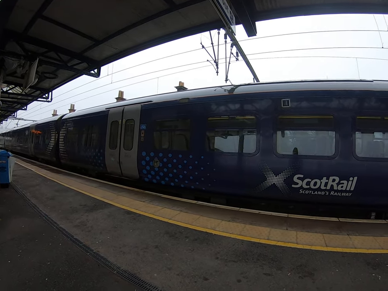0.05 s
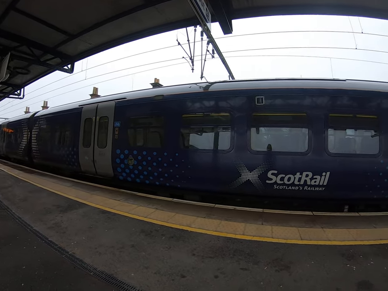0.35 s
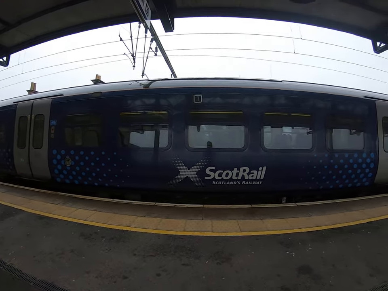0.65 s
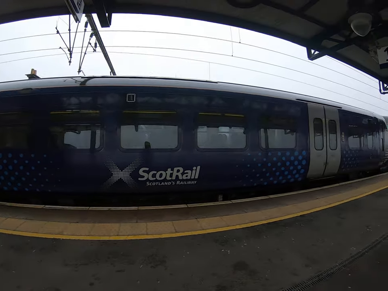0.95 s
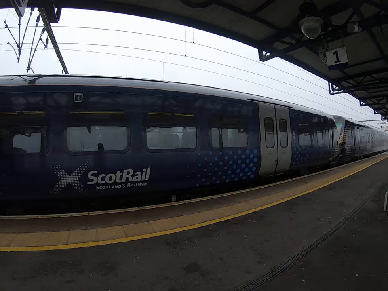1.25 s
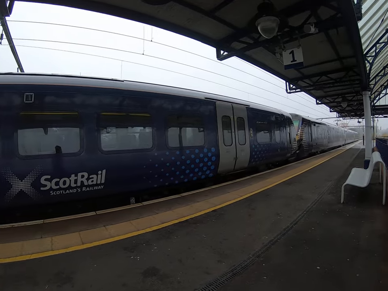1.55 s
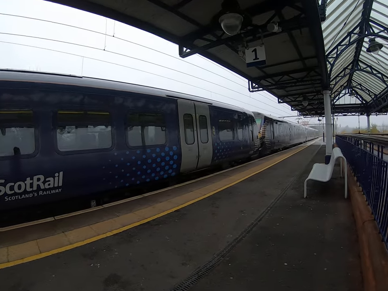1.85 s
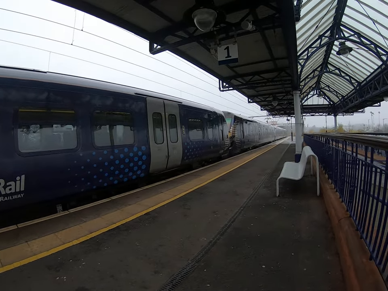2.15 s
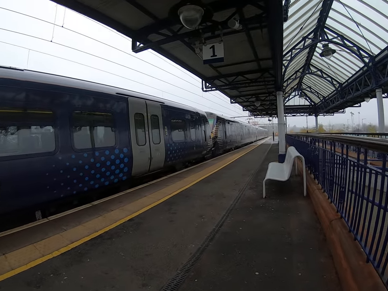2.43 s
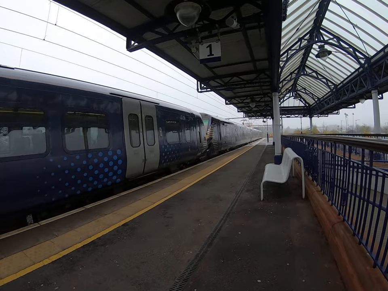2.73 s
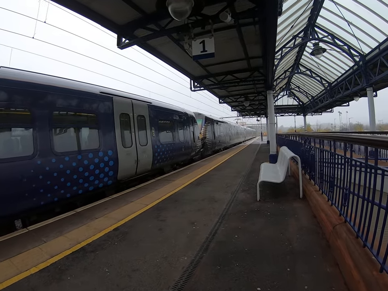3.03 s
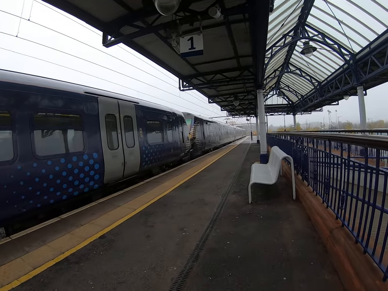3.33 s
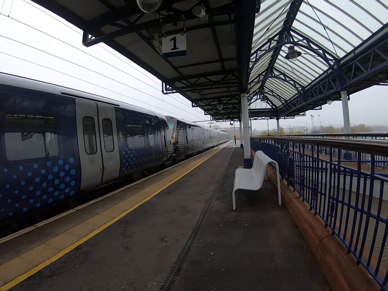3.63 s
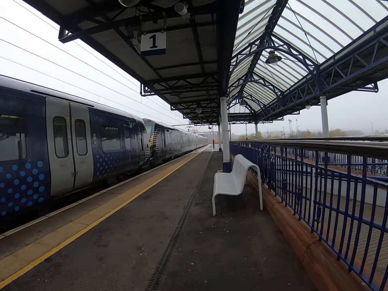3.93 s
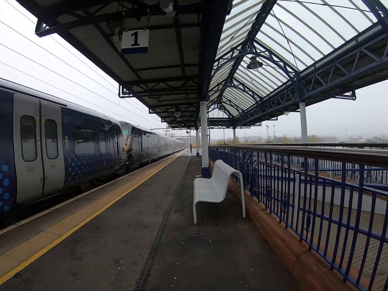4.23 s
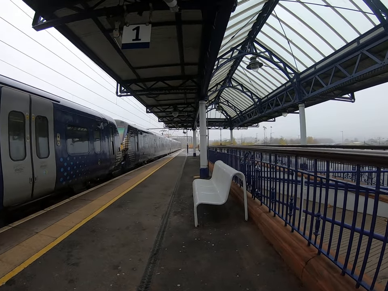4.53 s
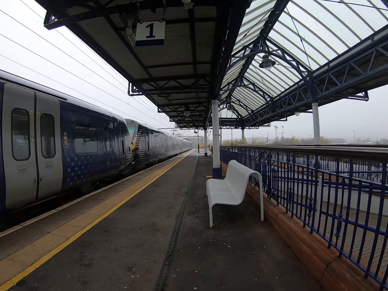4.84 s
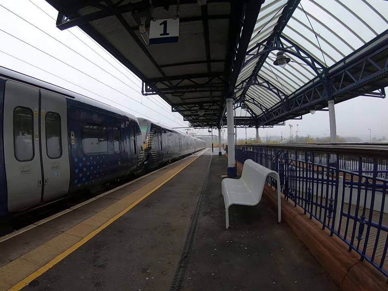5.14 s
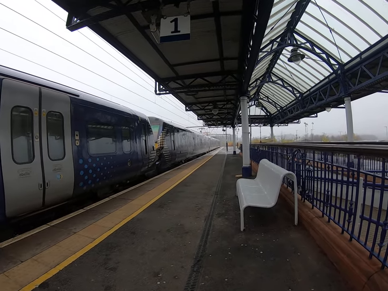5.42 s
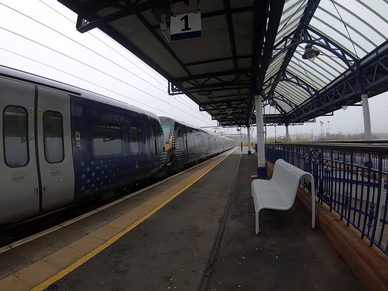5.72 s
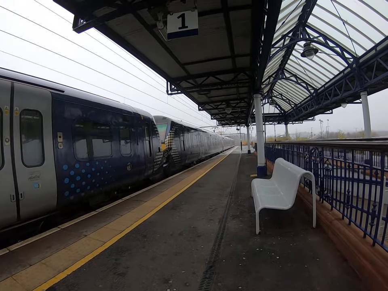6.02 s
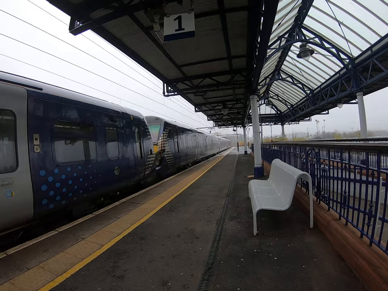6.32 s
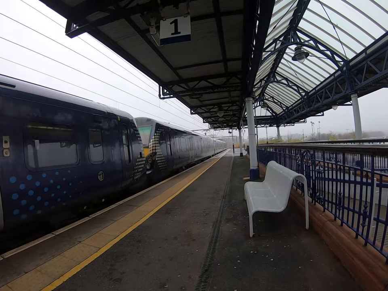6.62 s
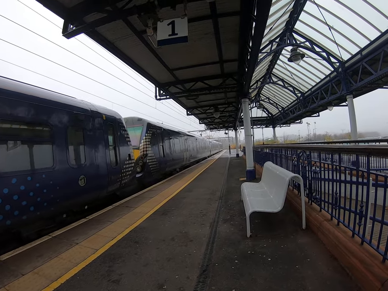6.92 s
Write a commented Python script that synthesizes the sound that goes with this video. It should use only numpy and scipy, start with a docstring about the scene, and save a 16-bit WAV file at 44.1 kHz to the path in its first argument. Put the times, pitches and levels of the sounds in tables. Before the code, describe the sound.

An electric train pulls slowly away, heard close by from a roofed platform. It starts with a high, shimmering electric whine and a thin whistle over a deep motor hum and rushing fans. Wheel rumble builds quickly while the gears growl upward and the undercarriage groans. Midway a wavering low drone swells past, with a brief spit of hiss and a few faint ticks. The whine softens as the rumble carries on.

```python
"""An inverter sings over a deep motor hum as an electric train pulls away along a roofed platform.
Its fixed combs of lines shimmer ever faster as echoes slide against the direct sound; a converter whistles.
Rail roughness raises a rumble and roar, gears growl upward and the bogie frames groan.
An underframe unit drones past, and cooling fans rush behind it all."""
import sys
import numpy as np
from scipy import signal
from scipy.fft import rfft, irfft, next_fast_len
from scipy.io import wavfile

SR = 44100
rng = np.random.default_rng(int(sys.argv[2]) if len(sys.argv) > 2 else 0)


def waveform_to_disk(signal):
    """Save audio, clipped to [-1, 1], as 16-bit WAV at the path in sys.argv[1]."""
    frames = np.transpose(np.atleast_2d(signal))
    scaled = np.clip(frames, -1, 1) * 32767
    samples = np.round(scaled).astype(np.int16)
    wavfile.write(sys.argv[1], SR, samples)


N = 311787
T = np.arange(N) / SR
FFT_SIZE = next_fast_len(N, real=True)
BINS_HZ = np.maximum(np.arange(FFT_SIZE // 2 + 1) * SR / FFT_SIZE, 1)
SOUND_M_PER_S = 343


def undb(db):
    """Decibels to gain."""
    return 10 ** (np.asarray(db) / 20)


def curves(table):
    """Each column of a table over time, sample by sample."""
    s, *columns = np.transpose(table)
    return [np.interp(T, s, c) for c in columns]


def across(table, hz):
    """Each column of a table over frequency, read at hz."""
    f, *columns = np.transpose(table)
    return [np.interp(np.log(hz), np.log(f), c) for c in columns]


def unit(x):
    """Stereo sound scaled to a mid rms of 1."""
    return x / np.sqrt(np.mean(x.mean(axis=0) ** 2))


def bell(offset, sigma):
    """Gaussian swell with peak 1."""
    return np.exp(-0.5 * (offset / sigma) ** 2)


def walk(rate_hz):
    """Smooth random wander with spread 1."""
    knots = np.arange(0, N / SR + 1, 1 / (4 * rate_hz))
    steps = np.convolve(rng.standard_normal(2 ** 13), np.hanning(5), "same")[:len(knots)]
    return np.interp(T, knots, steps / steps.std())


def pan(pan_db):
    """Left and right gains, pan_db apart."""
    return undb(np.array([[pan_db], [-pan_db]]) / 2)


def tone(hz, pan_db):
    """Panned sine on a pitch curve, mid rms 1."""
    return unit(pan(pan_db) * np.sin(2 * np.pi * np.cumsum(hz) / SR))


# Stereo image. Each row: frequency in Hz, coherence 0-1, phase lead in radians, left minus right in dB.
STEREO_IMAGE = [(60, 1, 0.45, -2.5), (150, 1, 0.5, -4.5), (266, 0.91, 0, -5.5), (450, 0.94, .5, -8.5),
                (583, 0.76, 1.2, -7.5), (795, 0.83, 1.74, -1.5), (1100, 0.65, 1.5, 2.5),
                (2300, 0.7, 1.12, 1.2), (3200, 0.6, 0.5, 2), (4280, 0.5, 0.04, -1), (6100, 0, 1.36, -5),
                (8000, .2, 4, -4.5), (9600, .16, 4.5, -0.5)]

def noise(gain):
    """Noise with this gain per bin, spread over the stereo image."""
    coherence, lead, pan_db = across(STEREO_IMAGE, BINS_HZ)
    shared, apart = rfft(rng.standard_normal((2, FFT_SIZE)))
    shared, apart = shared * np.sqrt(1 + coherence), apart * np.sqrt(1 - coherence)
    lean = undb(pan_db / 2)
    mid = np.sqrt(lean ** 2 + lean ** -2 + 2 * coherence * np.cos(lead))
    sides = np.array([(shared + apart) * lean * np.exp(1j * lead), (shared - apart) / lean])
    return unit(irfft(sides * gain / mid, FFT_SIZE)[:, :N])


def coloured(spectrum):
    """Stereo noise shaped by a spectrum table."""
    return noise(undb(across(spectrum, BINS_HZ)[0]))


def ringing(hz, width_hz):
    """Stereo noise in one steep-sided resonance."""
    return noise(1 / (1 + ((BINS_HZ - hz) / (width_hz / 2)) ** 2))


# Fan and air noise. Each row: frequency in Hz, relative density in dB.
FAN_SPECTRUM_DB = [(60, -7), (125, 18.5), (170, 4), (240, -10), (350, 5.5), (450, 6.5), (600, -12),
                   (950, -3.5), (1300, -16), (1900, -18), (4000, -21.5), (9600, -37), (10500, -84.5)]
AIR_SPECTRUM_DB = [(500, -25.5), (1500, -5.5), (3100, 2), (4000, -1.5), (4700, -6), (6300, -6.5),
                   (7500, -9), (8800, -13.5), (9650, -7.5), (10300, -36.5), (14000, -47)]
# Blade tones. Each row: frequency in Hz, relative level in dB.
BLADE_LINES = [(339, -8.5), (388.3, -10.5), (484.5, -8), (616, -14.5), (769, -16)]
# Blade and air envelopes. Each row: time in seconds, level in dB.
BLADE_DB = [(0, -38.5), (1, -36.5), (2.4, -41.5), (3.6, -41), (5, -50), (7.07, -45)]
AIR_DB = [(0, -51), (.45, -50), (.7, -48.5), (3, -49.3), (3.8, -51), (5, -49.5), (7.07, -49.5)]

def fans():
    """Cooling fans rush; the nearest sings on its blade tones and fades as it leaves."""
    blades = sum(undb(db) * tone(hz + 0.84 * walk(5), pan_db=-9) for hz, db in BLADE_LINES)
    fan_noise = coloured(FAN_SPECTRUM_DB) * undb(-37.5)
    air = coloured(AIR_SPECTRUM_DB) * undb(curves(AIR_DB)[0] + 0.56 * walk(3.3))
    return blades * undb(curves(BLADE_DB)[0]) + fan_noise + air


# Next car's drive. Each row: time in seconds, level in dB.
NEXT_CAR_DB = [(0, -70), (1, -65.5), (3.5, -65), (5, -62), (6, -59), (6.6, -58), (6.9, -55), (7.07, -56)]
# Its bands. Each row: centre in Hz, width in Hz, relative level in dB.
NEXT_CAR_BANDS = [(4727, 45, -1), (4827, 130, 1), (9470, 130, -10)]

def next_car():
    """The next car's drive comes closer: narrow bands of high noise."""
    bands = sum(undb(db) * ringing(hz, width_hz) for hz, width_hz, db in NEXT_CAR_BANDS)
    return bands * undb(curves(NEXT_CAR_DB)[0])


# Spit and tick noise. Each row: frequency in Hz, relative density in dB.
HISS_SPECTRUM_DB = [(1500, -14), (4000, 0), (9000, 0), (10500, -20), (14000, -32)]
# Spits. Each row: centre in seconds, sigma in seconds, relative level in dB.
HISS_SPITS = [(3.51, 0.042, -56), (3.6, .028, -60)]

def spits():
    """Short, sputtering spits of hiss."""
    envelope = sum(undb(db) * bell(T - s, sigma_s) for s, sigma_s, db in HISS_SPITS)
    sputter = undb(3.5 * walk(120) - 2)
    return envelope * sputter * coloured(HISS_SPECTRUM_DB)


# Ticks. Each row: start in seconds, level in dB.
HIGH_TICKS = [(3.495, -52), (3.585, -54), (3.94, -53), (4.287, -49), (4.296, -48), (4.305, -45),
              (4.845, -54)]

def ticks(crack_s=0.003, tail_s=0.022, tail_db=-13):
    """Faint, short high ticks, each with a brief tail."""
    envelope = 0
    for s, db in HIGH_TICKS:
        age_s = np.maximum(T - s, 0)
        decay = np.exp(-age_s / crack_s) + undb(tail_db) * np.exp(-age_s / tail_s)
        envelope += (T >= s) * undb(db) * decay
    return envelope * coloured(HISS_SPECTRUM_DB)


# Under the floor. Each row: time in seconds, relative hum and boom levels in dB.
HUM_BOOM_DB = [(0.0, -28.5, -42.5), (1.0, -28.5, -39), (2.0, -30, -37), (2.7, -26.5, -36),
               (3.4, -28.5, -37.5), (4.2, -24.5, -37), (4.8, -27, -38.5), (5.4, -24.3, -33.5),
               (6.0, -25.3, -35), (7.07, -26.5, -37.5)]
# Body boom. Each row: frequency in Hz, relative density in dB.
BOOM_SPECTRUM_DB = [(8, -14.5), (18, -5.5), (28, -3.5), (42, 2.5), (55, 8.5), (66, 8.5), (76, 3.5),
                    (100, -16.5), (160, -44.5), (600, -100)]

def hum_and_boom(hum_hz=48.5):
    """The motors hum steadily and the car bodies boom."""
    hum_db, boom_db = curves(HUM_BOOM_DB)
    hum = tone(hum_hz + 0.18 * walk(1.9), pan_db=-4.5) * undb(hum_db - 0.8 + 0.4 * walk(4.5))
    return hum + coloured(BOOM_SPECTRUM_DB) * undb(boom_db + 3.5)


# Drone envelope. Each row: time in seconds, level in dB.
DRONE_DB = [(2.3, -39), (2.74, -33.5), (2.83, -24), (2.91, -33), (2.98, -21.5), (3.12, -31), (3.25, -25),
            (3.42, -19), (3.58, -24), (3.68, -22.5), (3.92, -27), (4.02, -33), (4.18, -24.5), (4.38, -28),
            (4.55, -26), (5.25, -29.5), (5.45, -34.5), (5.75, -32.5), (5.95, -42), (6.1, -29.5),
            (6.42, -27), (6.68, -35), (6.95, -28), (7.07, -28.5)]

def underframe_drone(start_s=2.3, rise_s=0.2, settled_hz=262.6, run_up_hz=7, run_up_s=0.606):
    """A passing unit runs up its last few Hz, swells, then wavers and flutters as it leaves."""
    age_s = np.maximum(T - start_s, 0)
    leaving = age_s / age_s[-1]
    hz = settled_hz - run_up_hz * np.exp(-age_s / run_up_s) + 1.9 * leaving ** 2 * walk(9.75)
    flutter_db = 3 * leaving * walk(10)
    fade_in = np.minimum(age_s / rise_s, 1)
    return tone(hz, pan_db=-7.5) * undb(curves(DRONE_DB)[0] + flutter_db) * fade_in


# Train speed. Each row: time in seconds, speed in m/s.
SPEED_M_PER_S = [(0, 0.15), (.5, 0.48), (1.5, 0.87), (3, 1.58), (5, 2.3), (7.07, 2.77)]
# Rolling noise. Each row: time in seconds, relative rumble and roar levels in dB.
ROLLING_DB = [(0.0, -43, -46), (0.3, -41, -45), (0.6, -37, -42.5), (1.0, -34.5, -40), (1.4, -33.5, -41),
              (1.9, -31, -38.5), (2.4, -31.5, -38), (2.9, -30, -37), (3.4, -33.5, -38), (3.9, -33.5, -39),
              (4.5, -31, -37.5), (5.2, -32.5, -38), (5.9, -30.5, -37), (6.5, -31, -38.0),
              (7.07, -32.5, -38)]
# Track rumble and wheel roar. Each row: frequency in Hz, relative density in dB.
RUMBLE_SPECTRUM_DB = [(30, -27.5), (80, -13), (115, -10), (150, 3.5), (240, 2), (295, 1.5), (380, -3),
                      (470, -1), (570, -7), (700, -8), (900, -19), (1400, -26.5), (4000, -92.5)]
ROAR_SPECTRUM_DB = [(200, -52), (500, -13), (780, -1), (950, 0.5), (1150, -2), (1400, -4), (1900, -7),
                    (2500, -11.5), (3300, -16), (4500, -30), (8000, -39), (9600, -30), (10500, -73)]
# Wheel and rail modes. Each row: centre in Hz, width in Hz, relative level in dB.
WHEEL_RAIL_MODES = [(572, 12, -7.5), (693, 55, -9), (918, 120, -10), (1137, 110, -10.5), (1326, 31, -14)]

def wheels(full_ring_m_per_s=1.5):
    """Rail roughness shakes the track into a rumble and the wheels into a roar that rings with speed."""
    rumble_db, roar_db = curves(ROLLING_DB)
    rumble = coloured(RUMBLE_SPECTRUM_DB) * undb(rumble_db + 3 + 0.5 * walk(6.5))
    modes = sum(undb(db + 2 * walk(3.3)) * ringing(hz, width) for hz, width, db in WHEEL_RAIL_MODES)
    modes *= np.minimum(curves(SPEED_M_PER_S)[0] / full_ring_m_per_s, 1)
    roar = (coloured(ROAR_SPECTRUM_DB) + modes) * undb(roar_db - 0.6 + 0.5 * walk(8))
    return rumble + roar


# Frame groans. Each row: centre in seconds, level in dB, pitch in Hz.
FRAME_GROANS = [(0.539, -28, 199.5), (.82, -35.5, 200.5), (1.04, -28.5, 195), (1.261, -25.5, 184.5),
                (1.48, -24, 200), (1.75, -30, 180), (2.02, -29, 206), (2.32, -28.5, 286.6),
                (2.43, -25.5, 197.5), (3.02, -29.5, 190), (3.29, -26, 199), (4.13, -28, 291.7),
                (4.88, -27, 292), (5.79, -34, 180), (6.76, -28, 187), (6.83, -30.5, 292)]

def bogie_frames(load_db, mode_hz=192, groan_sigma_s=0.035):
    """Shaken by the gears, the frames rattle around one unsteady mode and now and then groan."""
    mode = tone(mode_hz * (1 + 0.0695 * walk(16)), pan_db=-4.5) * undb(-5 + 0.93 * walk(12))
    rattle = undb(-5) * ringing(hz=207, width_hz=71)
    shake = undb(load_db - 2.5 + 2 * walk(6))
    waver = 1 + 0.0351 * walk(16)
    groans = sum(tone(hz * waver, pan_db=-5.5) * undb(db) * bell(T - s, groan_sigma_s)
                 for s, db, hz in FRAME_GROANS)
    return (mode + rattle) * shake + groans


# Gear mesh. Each row: time in seconds, pitch in Hz.
MESH_HZ = [(0, 150.6), (.5, 203.6), (1.3, 192.2), (2.1, 236), (2.6, 258.4), (3, 270.2), (4.5, 284.2),
           (7.07, 288.7)]

def gears(load_db, leaves_s=2.3, fade_db_per_s=1.8, casing_hz=445):
    """A rough mesh tone climbs; its slightly sharp octave swells through a casing resonance."""
    hz = curves(MESH_HZ)[0]
    mesh_db = load_db - 1.5 - fade_db_per_s * np.maximum(T - leaves_s, 0)
    mesh = tone(hz * (1 + 0.0506 * walk(18)), pan_db=-6.5) * undb(mesh_db + 2.1 * walk(14))
    casing = 1 / np.sqrt(1 + ((2 * hz - casing_hz) / 35) ** 2)
    octave = tone(2 * hz * (1.04 + 0.027 * walk(18)), pan_db=-6)
    return mesh + octave * casing * undb(load_db - 8.5 + 1.4 * walk(10))


def moving_lines(lines, travel_m, scatter, roof, slant=0.35, build_m=0.76, echoes=10):
    """One signal per line of a moving source: the roof echo beats with it, scattered echoes shimmer."""
    step = 256
    way_m = travel_m[::step]
    # A slant is metres of echo detour per metre of travel.
    roof_slant = 0.29
    girders_m = 0.012 * walk(1.5)[::step]
    roof_m = roof_slant * way_m + girders_m + rng.random() / 2
    slants = slant * np.cos(np.pi * (np.arange(echoes) + rng.random(echoes)) / echoes)[:, None]
    detour_m = np.vstack([roof_m, slants * way_m + rng.random((echoes, 1))])
    build_up = np.minimum(way_m / build_m, 1) ** 0.62
    strength = np.append(roof, np.full(echoes, scatter / np.sqrt(echoes)))[:, None] * build_up
    side_lag = np.append(0, rng.standard_normal(echoes))[:, None]
    sounds = []
    for hz, db in lines:
        _, lead, pan_db = across(STEREO_IMAGE, hz)
        paths = strength * np.exp(2j * np.pi * detour_m * hz / SOUND_M_PER_S)
        carrier = np.exp(2j * np.pi * (hz * T + rng.random()))
        channels = []
        for side in (1, -1):
            field = 1 + (paths * np.exp(1j * side * side_lag * min(hz / 2500, 2))).sum(axis=0)
            field *= np.exp(0.5j * side * lead) * undb(side * pan_db / 2)
            channels.append((np.interp(T, T[::step], field) * carrier).real)
        sounds.append(undb(db) * unit(np.array(channels)))
    return sounds


def flares(hz, table, travel_m, sigma_waves):
    """Swells of one line, as when echoes fall into step; they pass quicker as the train gathers way."""
    sigma_m = sigma_waves * SOUND_M_PER_S / np.mean(hz)
    swells = 0
    for k, (s, db, pan_db) in enumerate(table):
        sides = pan(pan_db)
        swell = undb(db) * bell(travel_m - np.interp(s, T, travel_m), sigma_m)
        swells += (-1) ** k * sides / sides.mean() * swell  # sign flips put a null between neighbours
    return tone(hz * np.ones(N), pan_db=0) * swells


# Whistle and its octave. Each row: time in seconds, level in dB.
WHISTLE_DB = [(0, -58), (.35, -47.5), (.5, -49.5), (.7, -45), (.85, -55), (1.33, -68), (1.65, -59),
              (2.2, -60), (2.8, -56.5), (3.5, -60.5), (4.2, -61), (5.35, -57), (5.65, -61.5), (7.07, -61.5)]
WHISTLE_OCTAVE_DB = [(0, -74), (2.2, -82), (5.5, -81), (7.07, -88)]
# Whistle flares. Each row: centre in seconds, level in dB, left minus right in dB.
CONVERTER_FLARES = [(1.12, -49, -11), (1.55, -53.5, -9), (1.9, -59, -4), (2.12, -53, -3), (2.39, -49.5, -2),
                    (2.64, -53, 1), (2.96, -51.5, -2), (3.08, -50.5, -4), (3.26, -56, 1), (3.36, -48, -11),
                    (3.67, -59, -7), (3.79, -53, -5), (3.92, -57, -10), (4.38, -54, -4), (4.56, -55, -4),
                    (4.71, -56, -2), (4.9, -57, -2), (5.03, -53, -3), (5.12, -48, -4), (5.19, -51, -4),
                    (5.319, -49.5, -8), (5.45, -48.5, -11), (5.77, -54, -4), (6.01, -54, -8),
                    (6.23, -60, -3), (6.9, -59, -4)]

def converter_whistle(travel_m, hz=6023.5, drop_hz=9.2, passes_s=4.4, turn_s=0.45):
    """The auxiliary converter whistles with a faint octave; its flares sink in pitch as it goes by."""
    whistle, = moving_lines([(hz, 0)], travel_m, scatter=0.86, roof=0.1, slant=0.5, build_m=3.8)
    octave, = moving_lines([(2 * hz, 0)], travel_m, scatter=0.9, roof=0.3)
    sinking_hz = hz - drop_hz * (1 + np.tanh((T - passes_s) / turn_s)) / 2
    swells = flares(sinking_hz, CONVERTER_FLARES, travel_m, sigma_waves=1)
    return whistle * undb(curves(WHISTLE_DB)[0]) + octave * undb(curves(WHISTLE_OCTAVE_DB)[0]) + swells


# Switching sidebands. Each row: frequency in Hz, relative level in dB.
LOW_COMB = [(1200, 0), (1400, -8.5), (1500, -5)]
OCTAVE_COMB = [(5300, -6), (5400, -2.5), (5500, -15)]
HIGH_COMB = [(3704, 3.5), (3900, 0), (4000, 2.5), (4100, 2.5), (4200, -4), (6500, -7.5), (6600, 0.5),
             (6700, 2), (6800, 3), (6900, -4), (7000, -7), (8000, -6.5), (8100, -8.5), (8200, -5.5),
             (8300, -9), (9400, -0.5)]
# Comb envelopes. Each row: time in seconds, relative dB of the low and octave combs, and of the high comb.
COMB_DB = [(0.0, -46, -61.5), (0.52, -49.5, -65), (0.62, -53, -63.5), (1.08, -57, -67), (1.35, -60, -69.5),
           (1.5, -53, -69.5), (1.68, -62, -68), (2.2, -61.5, -70.5), (2.9, -58, -68.5), (3.4, -61.5, -70),
           (4.3, -62.5, -71.5), (5.5, -64.5, -70.5), (7.07, -67, -77)]
# High comb flare. Each row: centre in seconds, level in dB, left minus right in dB.
HIGH_COMB_FLARES = [(.69, -53, 0)]

def inverter_combs(travel_m):
    """Sidebands of the switching rate sound below and above the song; one flares as the wheels start."""
    low_octave_db, high_db = curves(COMB_DB)
    low = sum(moving_lines(LOW_COMB, travel_m, scatter=1.0, roof=0.86))
    octave = sum(moving_lines(OCTAVE_COMB, travel_m, scatter=0.86, roof=0.38))
    high = sum(moving_lines(HIGH_COMB, travel_m, scatter=0.87, roof=0.32))
    flare = flares(3900, HIGH_COMB_FLARES, travel_m, sigma_waves=0.35)
    return (low + octave) * undb(low_octave_db + 1.1) + high * undb(high_db + 1) + flare


# Lower, centre and upper song lines. Each row: frequency in Hz, relative level in dB.
SONG_COMB = [(2600, -0.5), (2700, 0), (2800, -0.5)]
# Their envelopes. Each row: time in seconds, relative lower, centre and upper levels in dB.
SONG_DB = [(0, -40, -43.5, -46.5), (.3, -41, -47, -50), (.56, -57, -40, -43), (.65, -51, -39, -45),
           (.73, -39, -46, -50), (.81, -39, -38, -46), (.9, -53, -41, -49), (.99, -43.5, -52, -52),
           (1.15, -53, -44.5, -54), (1.3, -46, -43, -47), (1.48, -51, -50, -45), (1.66, -48, -47.5, -59),
           (1.84, -40, -60, -47), (2.04, -50, -49, -59), (2.22, -48.5, -49, -50), (2.37, -53, -39, -48),
           (2.55, -59, -49.5, -52), (2.75, -58, -51, -57), (2.9, -55, -54, -46), (3.08, -58, -61, -54),
           (3.32, -57, -45.5, -60), (3.44, -53, -52, -59), (3.55, -55, -46, -64), (3.72, -60, -50.5, -62),
           (3.8, -54, -60, -55), (4.7, -56.5, -59, -61), (5.15, -53, -53, -59), (5.65, -58, -56, -64),
           (6.4, -58.5, -53, -62), (7.07, -55, -56.5, -59)]
# Their flares. Each row: centre in seconds, level in dB, left minus right in dB.
LOWER_LINE_FLARES = [(3.48, -54, 3), (4.97, -54, 2), (5.27, -55, 3), (5.43, -51, 3), (5.98, -46, 3),
                     (6.67, -49, 3)]
CENTRE_LINE_FLARES = [(4.4, -48, 3), (4.92, -48, 3), (5.2, -46, 3), (5.38, -46.5, 3), (6.27, -46.5, 3),
                      (6.36, -43, 3), (6.53, -41, 3), (6.81, -52, 3)]
UPPER_LINE_FLARES = [(4.47, -50, 3), (4.92, -52, 3), (5.82, -48, 3), (6.2, -57, 3), (6.42, -53, 3)]

def inverter_song(travel_m):
    """Switching makes the windings sing on three main lines 100 Hz apart."""
    lines = moving_lines(SONG_COMB, travel_m, scatter=0.82, roof=0.072, slant=0.55, build_m=9.8)
    song = sum(line * undb(db + 0.5) for line, db in zip(lines, curves(SONG_DB)))
    for (hz, _), table in zip(SONG_COMB, (LOWER_LINE_FLARES, CENTRE_LINE_FLARES, UPPER_LINE_FLARES)):
        song += flares(hz, table, travel_m, sigma_waves=0.47)
    return song


def scene():
    """The departing train, heard from the platform."""
    travel_m = np.cumsum(curves(SPEED_M_PER_S)[0]) / SR
    load_db = curves(ROLLING_DB)[0]  # gears and frames follow the rumble
    electrics = inverter_song(travel_m) + inverter_combs(travel_m) + converter_whistle(travel_m)
    electrics += next_car() + undb(-85) * ringing(hz=14450, width_hz=350)  # faint switching fizz on top
    running_gear = wheels() + gears(load_db) + bogie_frames(load_db)
    return electrics + running_gear + spits() + ticks() + underframe_drone() + hum_and_boom() + fans()


def record(dry):
    """Steep low-pass at 14.8 kHz."""
    return signal.sosfilt(signal.ellip(8, 0.2, 70, 14800, fs=SR, output="sos"), dry)


dry = scene()
out = record(dry)
waveform_to_disk(out)
```